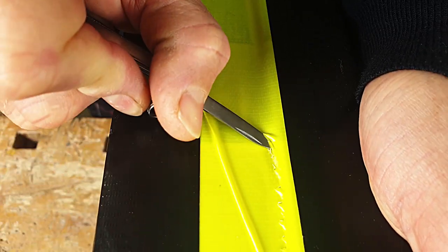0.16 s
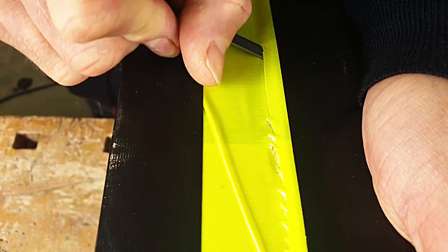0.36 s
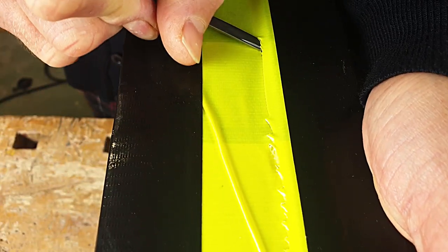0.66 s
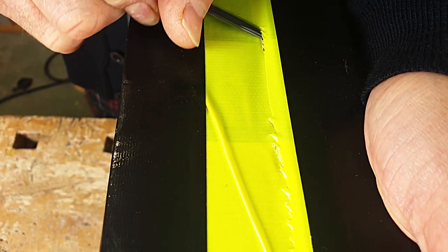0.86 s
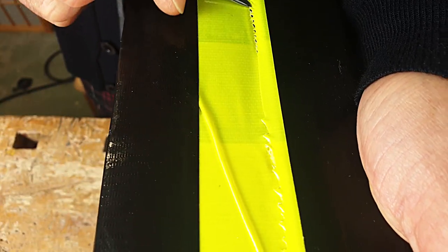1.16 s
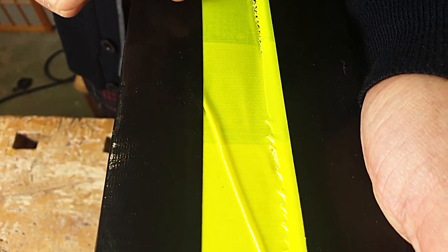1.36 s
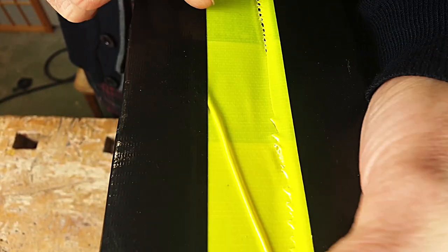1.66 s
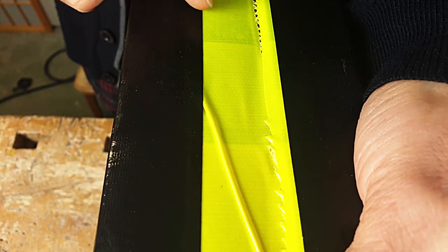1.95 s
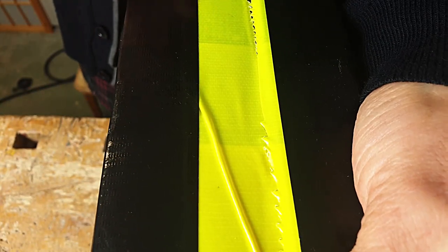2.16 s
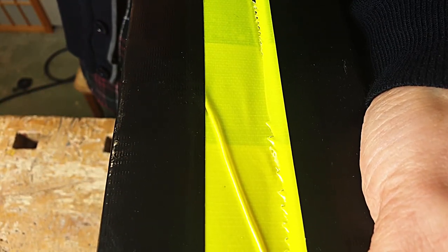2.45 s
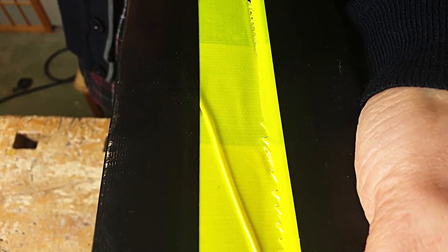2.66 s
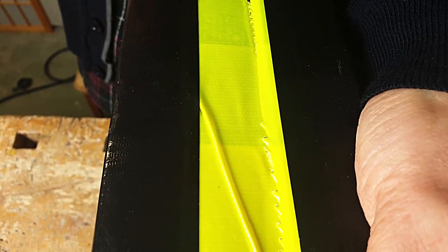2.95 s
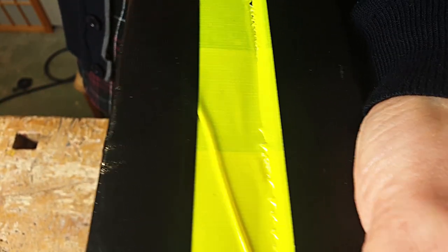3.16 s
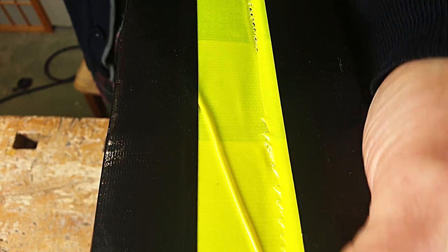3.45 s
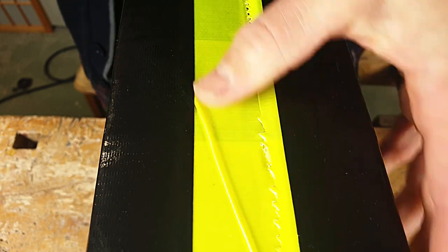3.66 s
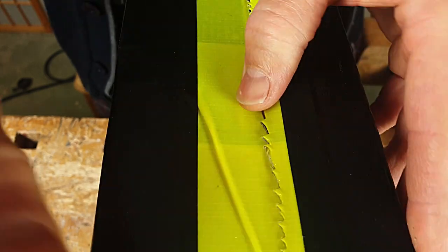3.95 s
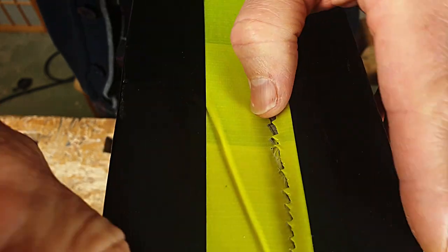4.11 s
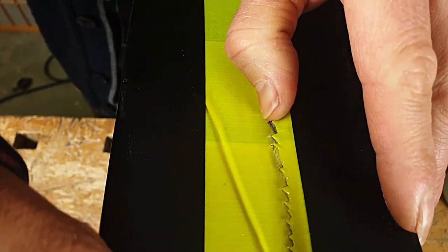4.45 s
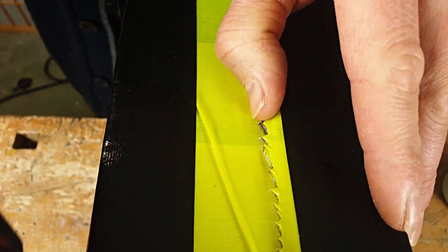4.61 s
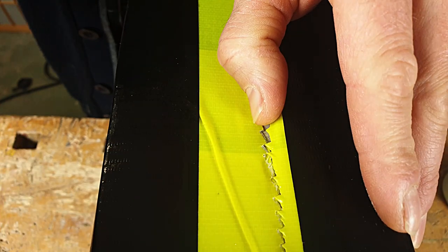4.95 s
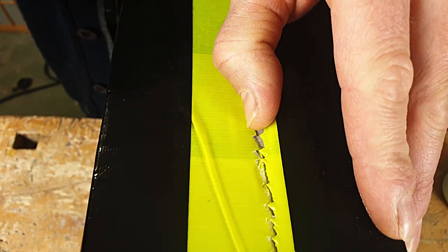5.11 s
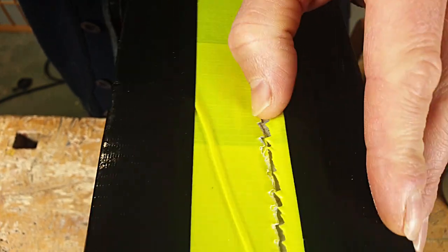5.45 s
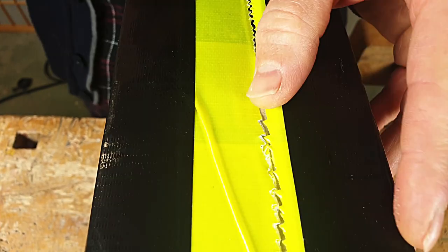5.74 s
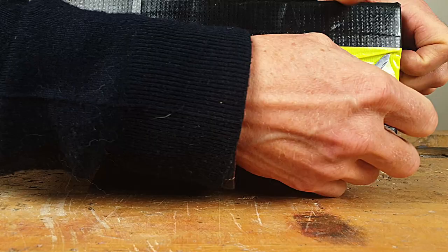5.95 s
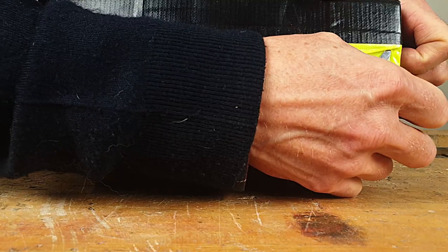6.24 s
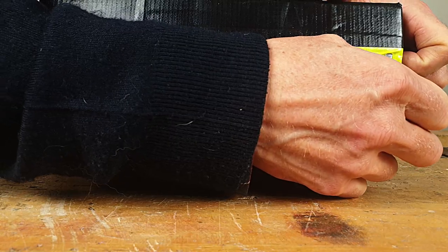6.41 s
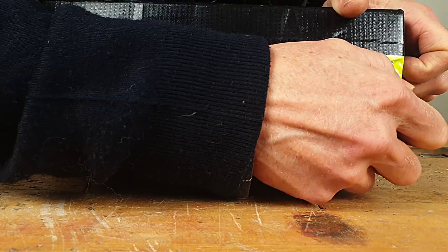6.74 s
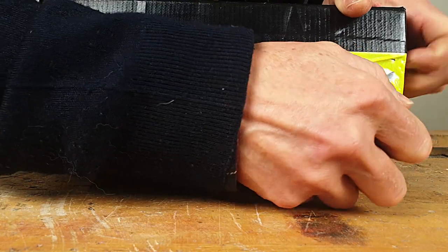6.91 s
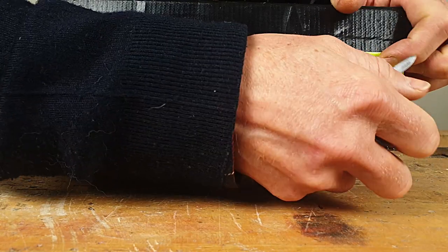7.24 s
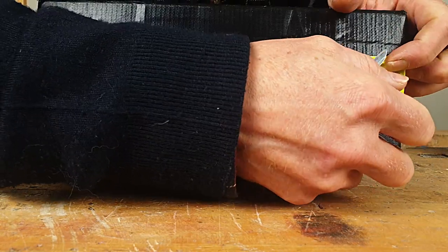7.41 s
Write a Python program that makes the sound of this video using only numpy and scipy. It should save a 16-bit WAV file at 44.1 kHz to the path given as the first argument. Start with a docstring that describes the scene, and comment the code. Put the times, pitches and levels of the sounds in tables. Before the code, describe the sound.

A bare workshop heard closely in stereo, the work sitting left, with a dense half-second echo and very faint air noise. At 0 s a short weak rip and a skin rub; at 0.35 s sharp snaps, a heavy hollow knock and a loud crackling tear. From 0.7 to 1.5 s come lighter zipper-like strokes, stray thread snaps and ticks. Soft finger bumps and rubbing fill 1.4-1.8 s. From 2 to 3 s bright snaps and more tearing strokes return, with boxy knocks from 2.4 s, ending in a strong thump and rip at 3.15 s. Then it is mostly quiet: faint rubbing, gentle taps around 3.5-4.5 s, crisp snaps near 4.9 s, and knocks at 5.06 and 5.3 s, the second heavier. Soft drags follow, one sharp echoing blade click at 6.5 s, a dull tiny snap at 6.7 s, and faint handling to about 7.5 s.

```python
"""In a bare workshop, a small blade slits cloth duct tape along the seam of a box on a wooden workbench.
Each stroke parts a row of nearly evenly spaced threads: each cracks, twangs the tape and thuds in the box.
Fibres tear and tick as sparse grains, tough threads snap alone, and jerks of the blade knock box and bench.
Fingers bump the box, hands rub the tape with slipping grains, and the blade clicks once.
Dense random reflections ring after each sound, over faint air noise."""
import sys
import numpy as np
from scipy import signal
from scipy.fft import rfft, irfft
from scipy.io import wavfile

SR = 44100
rng = np.random.default_rng(int(sys.argv[2]) if len(sys.argv) > 2 else 0)


def transcribe(signal):
    """Save signal, clipped to [-1, 1], as a 16-bit WAV file at the path in sys.argv[1]."""
    frames = np.atleast_2d(signal).T
    limited = np.clip(frames, -1, 1)
    pcm = np.round(limited * 32767).astype(np.int16)
    wavfile.write(sys.argv[1], SR, pcm)


N = 333837  # length of the scene in samples

# Levels in the tables are relative: the functions add their own trims.
# Treble slopes tilt a crack's spectrum above a knee.

# strokes of the blade through the weave: (time [s], length [s], thread rate [1/s], crack energy [dB],
# treble slope [dB/octave], box thud energy [dB], fine fibre level [dB])
STROKES = [(0.002, 0.028, 39.7, -15, -2.5, -1.5, -43.5), (0.372, 0.042, 69, 3, 0.5, 8, -24.5),
           (0.67, 0.039, 69, -13, -1, -7.5, -44), (0.751, 0.087, 45.5, -10, -1, -13.5, -55),
           (0.936, 0.043, 113.4, -3, 0.5, 4.5, -29), (1.109, 0.1, 50.2, -10.5, 0, -5, -36.5),
           (1.236, 0.063, 63, -10.5, 0.5, -10.5, -45), (2.0729, .072, 106, -1.5, 5, -6.5, -27.5),
           (2.2132, .06, 54, -7, 0, -16, -38), (2.363, 0.097, 47.3, -10.5, -0.5, -6, -38),
           (2.538, .065, 38.8, -9, -1.5, -11.5, -44), (2.791, .088, 34.5, -14, -3.5, -3, -32),
           (3.146, .062, 37, -3, 2.5, 3, -25)]
# tough threads that snap on their own:
# (time [s], crack energy [dB], treble slope [dB/octave], box thud energy [dB])
SNAPS = [(0.0939, -15, 7, -18), (0.109, -18.5, 0, -7), (0.3258, -7.5, 2, 1), (0.3281, -0.5, 1.5, 5),
         (0.36, -5.5, 7.5, -2.5), (0.459, -16.5, 7, -7.5), (0.9924, -11.5, 0.5, -9),
         (1.071, -13.5, -0.5, -17), (1.1022, -5, 1.5, 5), (1.4419, -9, -2, -5), (1.447, -12, -1, -9),
         (2.002, -8.5, 3, -13), (2.0547, 0.5, 3.3, -6), (2.0957, 2, 6, 2), (2.1306, -1.5, 3.5, 2.5),
         (2.2338, -3.5, 2.5, -5), (2.3082, -12.5, -0.5, -18.5), (2.929, -10, 1, -2.5),
         (4.104, -22.5, -15, -25.5), (4.8694, -6.5, 6, -18.5), (4.8959, -5.5, 4.5, -7),
         (5.0131, -8, 2.5, -16.5), (5.243, -23.5, -6.5, -13), (6.6925, -18, -11, -31)]
# the blade presses on the taut tape: (start [s], end [s])
PRESSING = [(.66, 1.45), (1.92, 2.95)]
# spectrum of a thread's crack: (frequency [Hz], level [dB])
CRACK_SPECTRUM = [(60, -24), (250, -14.5), (450, -3), (700, 4), (1250, 1.5), (1700, 2.5), (2800, -1.5),
                  (4400, -0.5), (6500, 1.5), (8500, -14), (10700, -8), (13000, -18), (16000, -17)]
# along a stroke: change of pull from start to end, spread between threads, unevenness as a share of spacing
EASE_DB, THREAD_SPREAD_DB, WEAVE_JITTER = -4, 2.5, 0.07
# the spray of fibres after a thread's break: echo gain, longest delay
THREAD_SMEAR, THREAD_SMEAR_S = .5, .0004

# jerks of the blade and knocks of the box: (time [s], crack energy [dB], treble slope [dB/octave],
# bench energy [dB], panel thud energy [dB], thud centre [Hz], edge clack energy [dB], contact resonance [Hz])
KNOCKS = [(0.3697, 10, -4.5, 4, 18, 232.2, 6, 5040), (2.3703, -12, -2, -23.5, -1.5, 223.1, -7.5, 1520),
          (2.4247, 0.5, -4, -9, 0, 228, -3, 2570), (2.604, 3, 2.5, -16.5, -1.5, 262, -1.5, 3060),
          (2.7909, 2.5, 1.8, -12, 8.5, 203.6, 7.5, 1430), (2.8464, -3.5, -1, 0.5, 7.5, 212.4, 2, 4400),
          (2.946, 1.5, -10, -19, 3, 238.4, 3, 3530), (3.1229, -7, -4, -4, 4.5, 223, 2.5, 3000),
          (3.1451, 10, -7, 4, 15, 173.5, 7.5, 4250), (5.0598, 4, -4, 3, 8, 274, 8.5, 850),
          (5.2919, 3, -5, 8, 14.5, 203.2, 7, 900)]
# ways the bench top, the box's panels and its stiff edges ring:
# (frequency [Hz], level [dB], time to fall by 60 dB [s])
BENCH_MODES = [(72, -5, .15), (85, 0.5, .12), (108, 0, .09)]
PANEL_MODES = [(136, -2, 0.069), (168.5, -1, 0.067), (201.6, 0.5, .09), (248.3, -0.5, .08),
               (275, -0.5, 0.051), (337, -1, .05), (426, -5.5, .06)]
EDGE_MODES = [(490, -2, .02), (570, 4, .03), (680, 3, .024), (860, -3, .016), (1100, -5, .015),
              (1400, -8, .013)]
EDGE_REACH_OCT = .9  # how widely a knock excites the edges around its centre
TOUCH_S, TOUCH_DB = .003, -22  # a light first touch: time ahead of the knock's time, level against the blow

# the blade's sharp click: (frequency [Hz], level [dB])
CLICK_SPECTRUM = [(60, -18), (200, -5.5), (400, -0.5), (1000, -1.5), (2200, 3.5), (4000, -1.5), (6500, -1),
                  (8500, -31.5), (15000, -33)]
CLICK_S, CLICK_DB = 6.532, 6  # time, energy

# fingers landing on the box: (time [s], thud energy [dB], thud centre [Hz])
BUMPS = [(1.376, -13.5, 288), (1.62, -14.5, 202), (1.6697, -12.5, 198), (1.753, -13.5, 170),
         (3.541, -25, 200.1), (3.714, -20, 223), (4.276, -22, 248), (4.377, -20, 214), (4.511, -12.5, 260),
         (7.389, -18, 399.2), (7.53, -23.5, 262)]
# skin and sleeve dragging on the box:
# (time [s], length [s], level [dB], resonance [Hz], hiss against that level [dB])
RUBS = [(0, .14, -43.5, 203, -6), (1.564, 0.61, -53, 242, -13.5), (3.38, 1.83, -64.5, 338.3, -9.5),
        (3.715, 0.18, -61.5, 595, -20), (3.881, 0.095, -58.5, 400, -4.5), (4.487, 0.2, -56, 350, -1.5),
        (4.53, 0.15, -61.5, 2100, -3), (4.656, 0.07, -49.5, 259, -2.5), (5.545, 0.055, -45, 385, -32),
        (5.654, 0.063, -60.5, 820, -22), (5.976, .26, -51.5, 284, -22), (6.15, 2.3, -69, 356, -12.5),
        (6.928, .17, -53, 361, -13.5), (7.385, 0.083, -52.5, 417, -15)]
# spectrum of the rubbing hiss: (frequency [Hz], level [dB])
RUB_HISS = [(60, -8), (200, -0.5), (700, -4.5), (1500, -2.5), (3500, -12), (6500, -7.5), (9000, -28.5),
            (15000, -27.5)]

# the work lies to the left of the microphones: (frequency [Hz], left minus right before scaling [dB])
LEFT_RIGHT = [(60, 6.5), (200, 5.3), (600, 7), (1300, 9), (2500, 4), (4400, 2), (8000, 12.5), (12000, 18)]
# how long the workshop's echo lasts: (frequency [Hz], time to fall by 60 dB [s])
ROOM_T60 = [(80, .48), (250, .46), (700, .48), (2000, .5), (5000, .44), (8000, .32), (15000, .24)]
# how loud the echo is: (frequency [Hz], level against the direct sound [dB])
ROOM_LEVEL = [(80, -10), (250, -11.5), (600, -7.5), (1500, -7), (4500, -8.5), (9000, -13.5), (15000, -8)]
# how alike left and right are in echo and air: (frequency [Hz], likeness [0 to 1])
ROOM_SAME = [(100, .6), (300, 1), (650, 0.2), (1400, 0), (15000, 0.11)]
# still workshop air: (frequency [Hz], level per Hz [dB])
AIR_SPECTRUM = [(20, -25), (40, -6), (130, 0), (370, -2), (800, -12), (1800, -16), (4800, -19), (8500, -31),
                (12300, -27), (16000, -33)]
AIR_DB = -65  # overall level
LOW_CUT_HZ, EDGE_HZ = 40, 16200  # bass cut and upper band limit of the microphones


def strokes():
    """The blade meets the threads at a nearly even rate while the pull eases."""
    out = np.zeros(N)
    for s, length, per_s, crack_db, slope, thud_db, _ in STROKES:
        for t in np.arange(0, length, 1 / per_s):
            late, strength = rng.standard_normal(2)
            pull_db = EASE_DB * t / length + THREAD_SPREAD_DB * strength
            sound = thread(crack_db + pull_db, slope, thud_db + pull_db)
            add(out, s + t + WEAVE_JITTER * late / per_s, sound)
    return out


def thread(crack_db, slope, body_db, tape_hz=2200, tape_oct=.7):
    """A thread cracks, twangs the free edge of the tape and lets the taut panel spring back."""
    crack = burst(impulse(varied(CRACK_SPECTRUM), slope), spread_s=THREAD_SMEAR_S, smear=THREAD_SMEAR)
    # the twang's pitch varies around tape_hz
    twang_hz = min(tape_hz * 2 ** (tape_oct * rng.standard_normal()), SR / 4)
    twang = signal.lfilter(*signal.iirpeak(twang_hz, 5, fs=SR), crack)
    panels = sized(ring(PANEL_MODES, centre_hz=265, width_oct=.8), body_db - 2)
    sound = panels + sized(ring(EDGE_MODES), body_db - 9)
    add(sound, 0, sized(crack + amp(1) * twang, crack_db + 1))
    return sound


def varied(points, uneven_db=3):
    """No two threads break with quite the same colour."""
    hz, db = np.transpose(points)
    return np.c_[hz, db + uneven_db * rng.standard_normal(len(hz))]


def tearing(fibre_db=-4.0, body_db=-6, lead_s=0.0054):
    """Fibres and glue give way all through each stroke and keep the box humming."""
    drive = np.zeros(N)
    for s, length, *_, level_db in STROKES:
        size = int((length + lead_s) * SR)
        slips = grains(size, per_s=680, spread_db=4.0) * signal.windows.tukey(size, .25)
        add(drive, s - lead_s, amp(level_db) * slips)
    # what one tiny break sounds like: the box's hum plus a short crack
    response = sized(ring(PANEL_MODES, uneven_db=2.0, detune=0), body_db)
    add(response, 0, sized(impulse(CRACK_SPECTRUM, slope_db=-2.5), fibre_db))
    return signal.oaconvolve(drive, response)[:N]


def snaps():
    """Tough threads hold the blade up, then part singly."""
    out = np.zeros(N)
    for s, crack_db, slope, thud_db in SNAPS:
        add(out, s - .0003, thread(crack_db, slope, thud_db))
    return out


def ticking(tick_db=-26, ticks_per_s=20):
    """Single small fibres give now and then while the blade presses."""
    drive = np.zeros(N)
    for start, end in PRESSING:
        ticks = grains(int((end - start) * SR), ticks_per_s, spread_db=3)
        # undo the boost that evening gives to sparse ticks
        add(drive, start, amp(tick_db) * ticks * np.sqrt(ticks_per_s / SR))
    crack = sized(impulse(CRACK_SPECTRUM, slope_db=-1), 0)
    return signal.oaconvolve(drive, crack)[:N]


def knocks(contact_q=3, contact_db=5, edge_ratio=2.7):
    """A blow touches, cracks at the contact, then rings the box's edges, its panels and the bench."""
    out = np.zeros(N)
    for s, crack_db, slope, bench_db, thud_db, thud_hz, clack_db, contact_hz in KNOCKS:
        crack = burst(impulse(CRACK_SPECTRUM, slope, knee_hz=3320), spread_s=0.001, smear=0.54)
        contact = signal.lfilter(*signal.iirpeak(contact_hz, contact_q, fs=SR), crack)
        crack = sized(crack + amp(contact_db) * contact, crack_db)
        edges = ring(EDGE_MODES, centre_hz=edge_ratio * thud_hz, width_oct=EDGE_REACH_OCT,
                     detune=0.046, rise_s=.001)
        for part in crack, sized(edges, clack_db):
            add(out, s - .0006, part)
            add(out, s - TOUCH_S, amp(TOUCH_DB) * part)
        panels = ring(PANEL_MODES, centre_hz=thud_hz, width_oct=0.48)
        add(out, s, sized(panels, thud_db - 0.5))
        add(out, s, sized(ring(BENCH_MODES, detune=0.046), bench_db - 1))
    return out


def click():
    """The blade slips off its hold and clicks: a sharp pulse with a short spray of echoes."""
    out = np.zeros(N)
    add(out, CLICK_S, sized(burst(impulse(CLICK_SPECTRUM), spread_s=.0011, smear=0.61), CLICK_DB))
    return out


def bumps(tick_db=-17.0, knuckle_db=-11):
    """Soft finger blows ring the panels and hardly the edges; the nail ticks faintly."""
    out = np.zeros(N)
    for s, db, thud_hz in BUMPS:
        add(out, s - .001, sized(ring(PANEL_MODES, centre_hz=thud_hz, width_oct=0.72), db))
        add(out, s - .001, sized(ring(EDGE_MODES), db + knuckle_db))
        nail = burst(impulse(CRACK_SPECTRUM, slope_db=-5), spread_s=0.0012, smear=0.25)
        add(out, s, sized(nail, db + tick_db))
    return out


def rubs(width_share=0.24, scuff_db=-6):
    """Skin sticks and slips on the tape: a resonance that depends on the grip, a dull scuff and a hiss."""
    out = np.zeros(N)
    for s, length, db, hz, hiss_db in RUBS:
        size = int(length * SR)
        slips = grains(size, per_s=640, spread_db=4.0)
        resonance = signal.iirpeak(hz, 1 / width_share, fs=SR)
        creak = signal.lfilter(*resonance, signal.lfilter(*resonance, slips))
        scuff = signal.lfilter(*signal.butter(2, [hz / 3, hz * 2], "band", fs=SR), slips)
        hiss = colour(grains(size, per_s=3200, spread_db=3.5), RUB_HISS)
        drag = evened(evened(creak) + amp(scuff_db) * evened(scuff))
        sound = drag + amp(hiss_db) * evened(hiss)
        add(out, s, amp(db) * sound * signal.windows.tukey(size, .4))
    return out


def direct(x, lag_s, leftness=1, bounce=0.11, left_bounce_s=.0012, right_bounce_s=0.00067):
    """Straight path, louder on the left; a positive lag delays the right. Each side adds a bench bounce."""
    hz = np.fft.rfftfreq(N, 1 / SR)
    ratio = amp(leftness * read(LEFT_RIGHT, hz))
    delay = np.exp(-2j * np.pi * hz * lag_s)
    sides = np.array([ratio, delay]) * np.sqrt(2 / (1 + ratio ** 2))
    comb = 1 + bounce * np.exp(-2j * np.pi * np.outer([left_bounce_s, right_bounce_s], hz))
    return irfft(rfft(x) * sides * comb / np.hypot(1, bounce), N)


def room(x, left_db=2.0, count=3):
    """The workshop's answer; its pattern changes as hands and box move, by blending several echoes."""
    turns = np.arange(N) / SR / 1.3
    wet = np.zeros((2, N))
    for k in range(count):
        share = np.sqrt(2 / count) * np.cos(np.pi * (turns + k / count))
        wet += signal.fftconvolve((x * share)[None], echo(), axes=1)[:, :N]
    return wet * amp([[left_db], [-left_db]])


def echo(build_s=0.0032):
    """Dense reflections that build up in a few milliseconds and die faster in the high treble."""
    taps = rng.standard_normal((2, SR)) * (rng.random((2, SR)) < 6000 / SR)
    hz, t, bands = signal.stft(evened(taps), SR, nperseg=256)
    hz = hz[:, None]
    t60 = read(ROOM_T60, hz)
    fade = amp(read(ROOM_LEVEL, hz) - 60 * t / t60)
    # the last factor keeps the energy the same for any decay time
    bands = paired(bands, hz) * fade * np.sqrt(np.log(10 ** 6) / (t60 * SR))
    tail = signal.istft(bands, SR, nperseg=256)[1]
    return tail * (1 - np.exp(-(np.arange(tail.shape[1]) / SR / build_s) ** 2))


def air():
    """Faint steady room noise: random noise shaped by a spectrum."""
    spectra = rfft(rng.standard_normal((2, N)))
    noise = irfft(paired(spectra, np.fft.rfftfreq(N, 1 / SR)), N)
    return amp(AIR_DB) * evened(colour(noise, AIR_SPECTRUM))


def paired(z, hz):
    """Makes two independent spectra as alike at each frequency as the likeness table says."""
    same = np.clip(read(ROOM_SAME, hz), -1, 1)
    return np.array([z[0], same * z[0] + np.sqrt(1 - same ** 2) * z[1]])


def grains(length, per_s, spread_db):
    """Sparse tiny slips of uneven size and random sign, scaled to rms 1."""
    size_db = spread_db * np.minimum(rng.exponential(1, length), 4)
    size = amp(size_db) * rng.choice([-1, 1], length)
    return evened(size * (rng.random(length) < per_s / SR))


def ring(modes, centre_hz=None, width_oct=.5, uneven_db=5.0, detune=0.036, rise_s=0.0027, size=14000):
    """Damped modes; the place of the blow favours those near a centre, and the grip detunes them."""
    hz, db, t60 = np.transpose(modes)[:, :, None]
    t = np.arange(size) / SR
    db = db + uneven_db * rng.standard_normal(hz.shape)
    weight = np.exp(-.5 * (np.log2(hz / centre_hz) / width_oct) ** 2) if centre_hz else 1
    hz = hz * (1 + detune * rng.standard_normal(hz.shape))
    motion = weight * amp(db - 60 * t / t60) * np.sin(2 * np.pi * hz * t) * SR / hz
    return np.gradient(motion.sum(0) * (1 - np.exp(-t / rise_s)))  # sound follows the change of motion


def burst(pulse, spread_s, smear, count=3, size=1500):
    """One break, then a short spray of smaller ones: all-pass echoes smear it without colouring it."""
    x, gain = np.pad(pulse, (0, size)), np.clip(smear, 0, .8)
    for share in rng.uniform(.15, 1, count):
        feedback = np.r_[1, np.zeros(int(share * spread_s * SR)), gain]
        x = signal.lfilter(feedback[::-1], feedback, x)
    return x * rng.choice([-1, 1])


def impulse(points, slope_db=0, knee_hz=2400, size=2048):
    """The sharpest pulse with a given spectrum that starts at once, tilted above the knee."""
    hz = abs(np.fft.fftfreq(size, 1 / SR))
    tilt_db = slope_db * np.log2(np.maximum(hz / knee_hz, 1))
    log_gain = np.log(amp(read(points, hz) + tilt_db))
    # the Hilbert transform gives the phase that packs the energy at the start
    return np.fft.ifft(np.exp(np.conj(signal.hilbert(log_gain)))).real[:size // 2]


def colour(x, points):
    """Filters by a spectrum."""
    size = x.shape[-1]
    return irfft(rfft(x) * amp(read(points, np.fft.rfftfreq(size, 1 / SR))), size)


def read(points, hz):
    """Reads a table on a log-frequency axis."""
    f, value = np.transpose(points)
    return np.interp(np.log(hz + 1), np.log(f + 1), value)


def amp(db):
    """Decibels to gain."""
    return 10 ** (np.asarray(db) / 20)


def evened(x):
    """Scales to rms 1 (rms is the average strength)."""
    return x / np.sqrt(np.mean(x ** 2) + 1e-20)


def sized(x, db):
    """Scales a short sound to a total energy."""
    return amp(db) * x / (np.linalg.norm(x) + 1e-12)


def add(mix, s, sound):
    """Mixes a sound in at a time; negative times become the start."""
    part = mix[max(round(s * SR), 0):][:len(sound)]
    part += sound[:len(part)]


def scene(click_room_db=4):
    """Work on the box close by, the click with a stronger echo, and the room around both."""
    cutting = strokes() + snaps() + ticking() + tearing()
    box = knocks()
    hands = bumps() + rubs()
    blade = click()
    near = direct(cutting, lag_s=.00008, leftness=1.2)
    near += direct(box, lag_s=.00005, leftness=1.5)
    near += direct(hands, lag_s=-0.000068)
    near += direct(blade, lag_s=-0.000082)
    return near + room(cutting + box + hands + amp(click_room_db) * blade) + air()


def record(dry):
    """The microphones cut the deep bass, peaks beyond full scale clip, then the top band is cut off."""
    thinned = signal.sosfilt(signal.butter(3, LOW_CUT_HZ, "high", fs=SR, output="sos"), dry)
    low_pass = signal.firwin(511, EDGE_HZ, window=("kaiser", 9), fs=SR)
    return signal.oaconvolve(np.clip(thinned, -1, 1), low_pass[None], "same")


dry = scene()
out = record(dry)
transcribe(out)
```